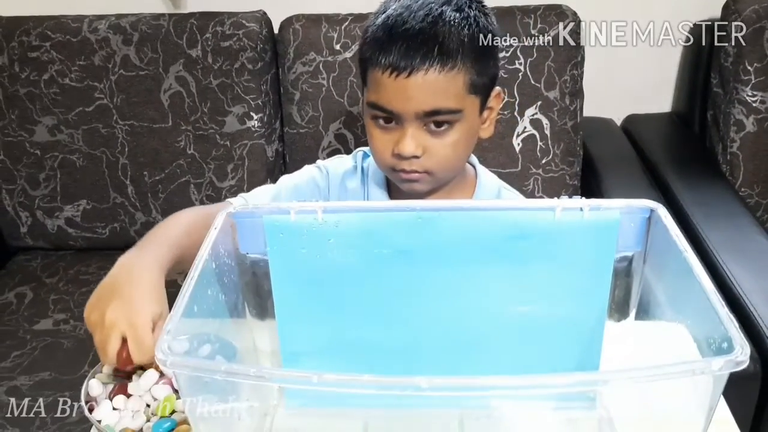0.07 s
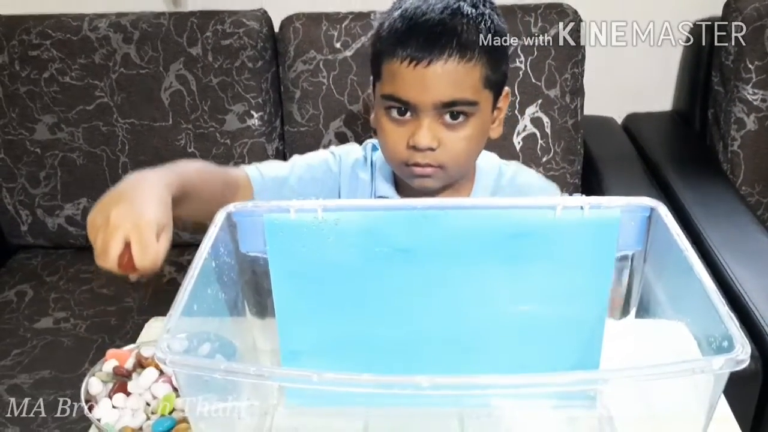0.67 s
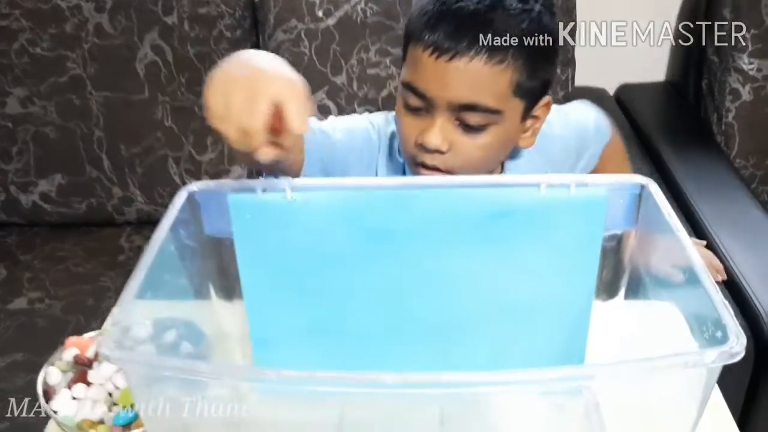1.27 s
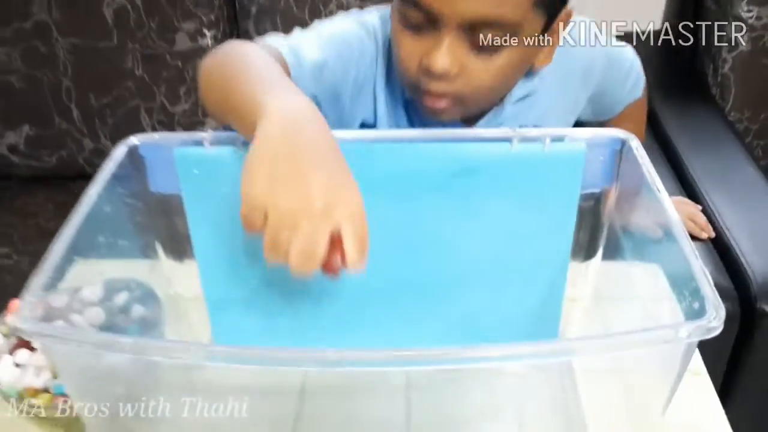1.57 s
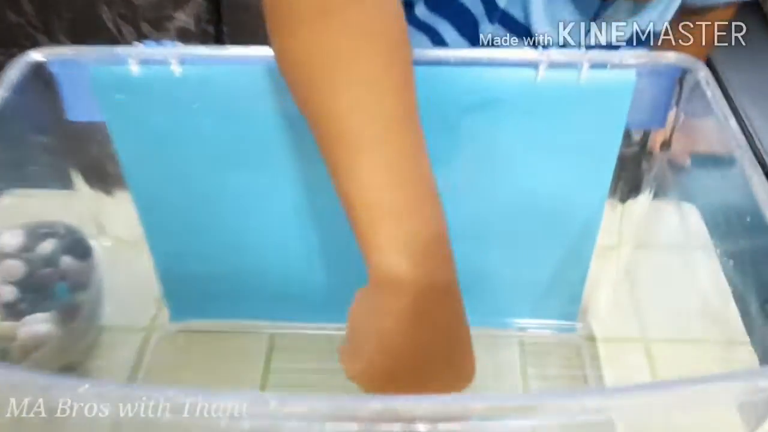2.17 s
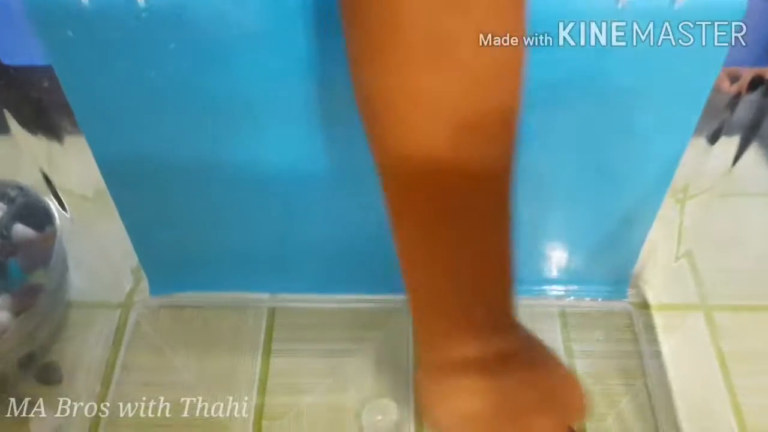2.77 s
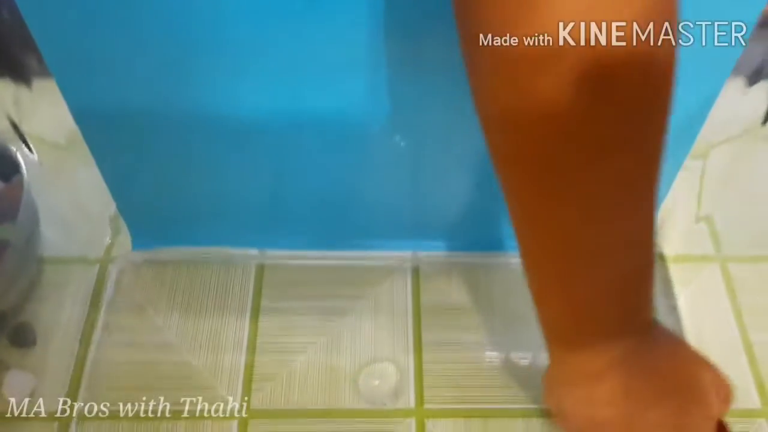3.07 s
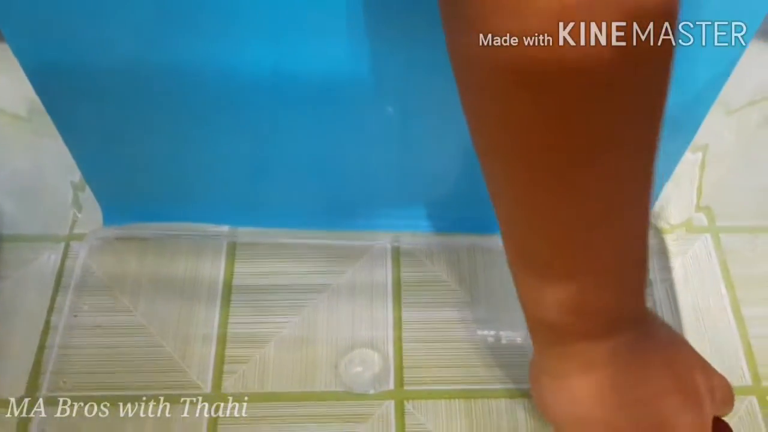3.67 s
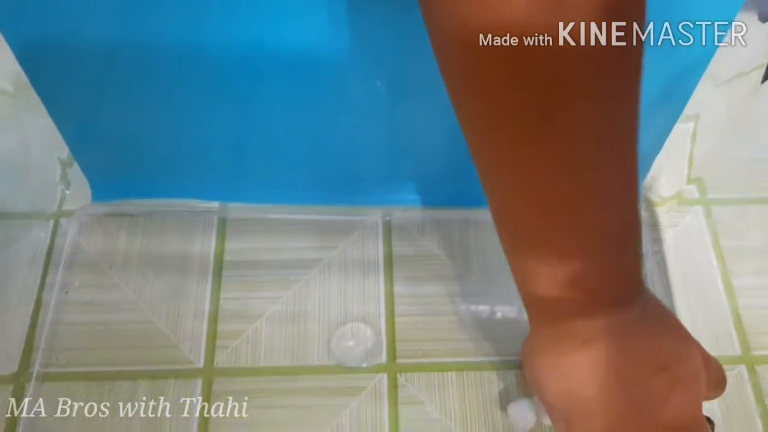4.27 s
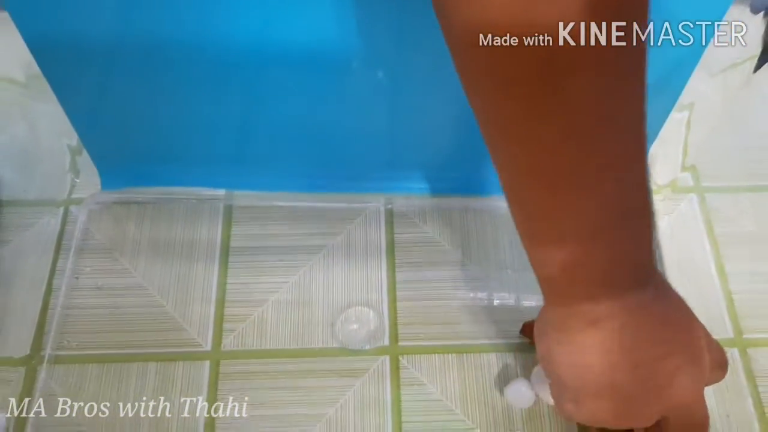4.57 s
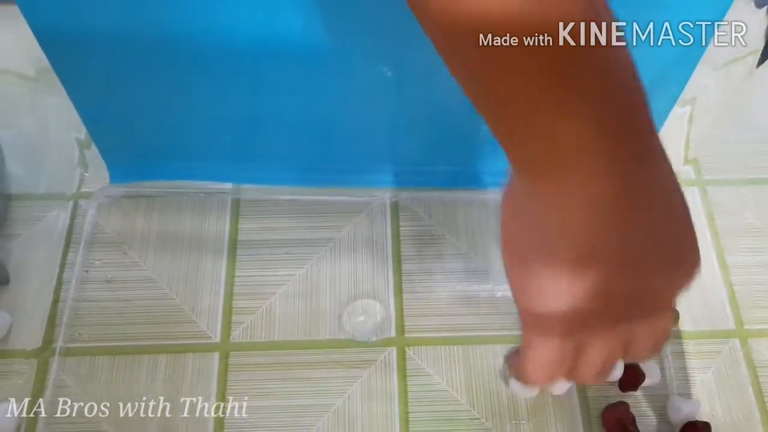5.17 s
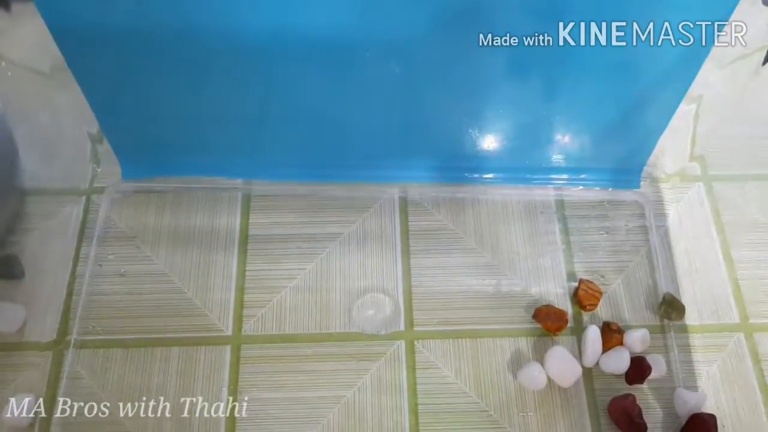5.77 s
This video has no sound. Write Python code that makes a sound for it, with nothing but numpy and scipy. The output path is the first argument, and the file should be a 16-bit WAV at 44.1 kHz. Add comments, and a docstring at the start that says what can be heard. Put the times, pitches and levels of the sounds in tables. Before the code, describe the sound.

Soft, dull bumps and rubbing come from a hand-held microphone, with a few light scuffs of skin against a plastic tub. Pebbles click in a fist, then fall into the empty tub, cracking, hopping and drumming on its thin bottom for about a second. A small tiled room rings briefly after them. A low thud and a faint rustle of cloth follow.

```python
"""A fistful of pebbles is dropped into an empty plastic tub in a small tiled room.
From 1 s a hand-held camera bumps and rubs softly while the arm reaches over the tub and brushes it.
The stones click in the fist, most as it opens near 4 s. Until 5 s they crack, hop and drum on the
thin floor, ringing the tub's modes, and the room rings after them. Last, the arm withdraws with
a low thud and a rustle of cloth, and the grip on the camera settles."""
import sys
import numpy as np
from scipy import signal
from scipy.fft import rfft, irfft
from scipy.io import wavfile
from scipy.ndimage import uniform_filter1d

SR = 44100
rng = np.random.default_rng(int(sys.argv[2]) if len(sys.argv) > 2 else 0)


def to_wav(s):
    """Save 16-bit WAV."""
    ch = np.atleast_2d(s).T  # columns
    pcm = np.round(np.clip(ch, -1, 1) * 32767)  # PCM
    wavfile.write(sys.argv[1], SR, pcm.astype(np.int16))


N = 265923


def gain_of(db):
    """Decibels to amplitude."""
    return 10 ** (np.asarray(db) / 20)


def pan(left_db):
    """Stereo gains for a left-over-right level difference."""
    return gain_of(np.vstack([left_db, -left_db]) / 2)


def read(points, hz):
    """Interpolates a (frequency, value) table on a log-frequency axis."""
    table_hz, value = np.transpose(points)
    return np.interp(np.log(hz + 1), np.log(table_hz + 1), value)


def unit(x):
    """Scales to energy 1 per channel."""
    return x / np.sqrt(np.sum(x ** 2) / len(x) + 1e-20)


def rise(t, rise_s):
    """Exponential approach to 1."""
    return 1 - np.exp(-t / rise_s)


def fade(t, t60_s):
    """Exponential decay, 60 dB in t60_s."""
    return np.exp(-np.log(1000) * t / t60_s)


def gate(t, length_s, attack_s, t60_s):
    """Linear attack at t = 0, hold until length_s, decay."""
    return np.clip(t / attack_s, 0, 1) * fade(np.maximum(t - length_s, 0), t60_s)


def add(mix, time_s, sound):
    """Mixes a sound in at time_s."""
    part = mix[:, round(time_s * SR):][:, :sound.shape[1]]
    part += sound[:, :part.shape[1]]


def colour(x, *spectra, size=4096):
    """Minimum-phase filter; its gain in dB is the sum of the spectra."""
    hz = abs(np.fft.fftfreq(size, 1 / SR))
    log_gain = np.log(gain_of(sum(read(points, hz) for points in spectra)))
    taps = np.fft.ifft(np.exp(np.conj(signal.hilbert(log_gain)))).real[:size // 2]
    return signal.fftconvolve(x, taps[None], axes=1)[:, :x.shape[1]]


# Left-right likeness of the sound field: (frequency [Hz], coherence [ratio])
COHERENCE = [(60, 0.88), (300, 0.89), (650, 0.45), (1300, 0), (16000, 0.088)]
def noise(size):
    """Stereo white noise, alike in the bass and unrelated in the treble."""
    left, other = rfft(rng.standard_normal((2, size)))
    alike = read(COHERENCE, np.fft.rfftfreq(size, 1 / SR))
    right = alike * left + np.sqrt(1 - alike ** 2) * other
    return irfft(np.array([left, right]), size)


def grainy(size, rough_db, grain_samples=60):
    """Friction noise: the level jumps from catch to catch."""
    catches = uniform_filter1d(rng.standard_normal(size), grain_samples) * np.sqrt(grain_samples)
    return noise(size) * gain_of(rough_db * catches)


def steady(spectrum, rough_db):
    """Scene-long coloured noise, rms 1."""
    return np.sqrt(N) * unit(colour(grainy(N, rough_db), spectrum))


def dense_modes(t60_table, size, bands=8):
    """Countless modes struck at once: noise of flat energy, each band with its own decay."""
    t, hz = np.arange(size) / SR, np.fft.rfftfreq(size, 1 / SR)
    spectrum, out = rfft(noise(size)), np.zeros((2, size))
    centres_hz = np.geomspace(150, 15000, bands)
    for centre_hz, weights in zip(centres_hz, np.eye(bands)):
        t60_s = read(t60_table, centre_hz)
        band = irfft(spectrum * read(np.c_[centres_hz, weights], hz), size)
        out += band * fade(t, t60_s) / np.sqrt(t60_s)
    return unit(out)


# Room tone: (frequency [Hz], gain [dB])
AIR_SPECTRUM = [(25, -17), (60, -8), (110, -8), (170, 3), (230, -15.5), (320, -12), (480, -14), (660, -8),
                (1000, -15.5), (2000, -16), (3200, -22.5), (8000, -24.5), (15000, -35)]
def air(rms_db=-63):
    """Faint, steady, low room noise."""
    return gain_of(rms_db) * steady(AIR_SPECTRUM, rough_db=0.5)


# Decay of the tiled room: (frequency [Hz], t60 [s])
ROOM_DECAY = [(150, 0.96), (400, 0.81), (1200, .36), (4000, 0.37), (8000, 0.34), (15000, 0.34)]
def room(x, build_s=0.0023, size=32768):
    """Reflections gather over a few milliseconds and die away."""
    t = np.arange(size) / SR
    tail = dense_modes(ROOM_DECAY, size) * (1 - np.exp(-(t / build_s) ** 2))
    return signal.fftconvolve(x, unit(tail), axes=1)[:, :N]


# Shirt crumples: (start [s], length [s], level [dB])
CRUMPLES = [(5.253, 0.096, -60.5), (5.418, .08, -61), (5.898, 0.1, -64.5)]
# Cloth noise: (frequency [Hz], gain [dB])
CLOTH_SPECTRUM = [(200, -20), (400, -3), (1150, 0), (1700, -7), (2600, -6), (3500, -18), (12000, -28)]
def shirt_rustles():
    """The shirt crumples in short, dull bursts as the arm withdraws."""
    t, level = np.arange(N) / SR, np.zeros(N)
    for start_s, length_s, level_db in CRUMPLES:
        level += gain_of(level_db) * gate(t - start_s, length_s, attack_s=0.004, t60_s=0.09)
    return level * steady(CLOTH_SPECTRUM, rough_db=3)


# Grip rub as the camera swings over the tub, then settles: (time [s], level [dB])
GRIP_SWING = [(0.5, -65), (1.0, -58), (1.45, -48.5), (1.98, -47), (2.17, -54.5), (2.39, -59.5),
              (3.01, -65.5), (3.14, -58.5), (3.9, -62)]
GRIP_SETTLE = [(5.199, -61.5), (5.39, -53.5), (5.484, -48.5), (5.666, -60.5), (5.82, -62), (6.03, -52)]
# Sleeve strokes: (start [s], length [s], level [dB])
SLEEVE_STROKES = [(0.974, 0.069, -62.5), (1.559, 0.088, -58.5), (1.707, 0.14, -54.5), (3.039, 0.13, -58),
                  (3.217, 0.33, -58.5), (3.4, 0.059, -70)]
# Dull camera body and sliding hiss: (frequency [Hz], gain [dB])
CAMERA_SPECTRUM = [(30, -25), (60, -21), (105, -6.5), (220, -9), (310, -1.5), (380, -8.5), (500, -14.5),
                   (950, -18), (2900, -37.5), (8000, -58)]
HISS_SPECTRUM = [(500, -15), (2000, 4.5), (5000, 7), (9000, 2.5), (15000, 1)]
def rubbing(grip_hiss_db=-18):
    """Friction: the grip shifts on the camera and the sleeve slides along the arm."""
    t = np.arange(N) / SR
    times_s, grip_db = np.vstack([GRIP_SWING, GRIP_SETTLE]).T
    grip = gain_of(np.interp(t, times_s, grip_db))
    slide = gain_of(grip_hiss_db) * grip
    for start_s, length_s, level_db in SLEEVE_STROKES:
        stroke = gate(t - start_s, length_s, attack_s=0.024, t60_s=0.4)
        slide = np.hypot(slide, gain_of(level_db) * stroke)
    return grip * steady(CAMERA_SPECTRUM, rough_db=1.5) + slide * steady(HISS_SPECTRUM, rough_db=1.5)


# Hand on the camera: (time [s], energy [dB], hollow ring [Hz], ring level [dB])
CAMERA_KNOCKS = [(1.149, -15, 363, -2), (1.29, -12.5, 352, -0.5), (1.323, -14, 324, 1),
                 (1.478, -4.5, 308.5, -2), (1.535, -12, 329, -3), (1.741, -8.5, 317, 0),
                 (1.815, -7.5, 309.3, -3.5), (1.856, -9, 301.7, 6), (1.971, -12.5, 313, -6),
                 (2.045, -13.5, 301, -7), (2.107, -12.5, 288.7, -4), (2.579, -19.5, 245, 4),
                 (2.68, -21, 238, -1), (3.049, -11, 309, 5.5), (3.258, -17, 310.3, -1.5),
                 (5.25, -14, 349.5, 4.5), (5.426, -13.5, 315.4, 2), (5.595, -15, 284, -10)]
def camera_bumps(size=16384):
    """Padded knocks swell and die in the camera's hollow body; harder ones scrape more."""
    t, out = np.arange(size) / SR, np.zeros((2, N))
    swell = rise(t, 0.0082) * fade(t, 0.31)
    for time_s, energy_db, hollow_hz, hollow_db in CAMERA_KNOCKS:
        hollow = unit(swell * np.sin(2 * np.pi * hollow_hz * t)[None])
        push = unit(colour(grainy(size, rough_db=2) * swell, CAMERA_SPECTRUM))
        scrape_db = 15 + 1.18 * energy_db
        tilt = [(130, 0.5), (270, 0), (380, 0), (900, scrape_db)]
        bump = unit(colour(push + gain_of(hollow_db) * hollow, tilt))
        add(out, time_s, gain_of(energy_db) * bump)
    return out


# Arm reaching over the tub and lifting away: (time [s], peak [dB], frequency [Hz], t60 [s])
ARM_BLOWS = [(1.186, -48, 100, 0.19), (1.321, -51, 103.5, 0.23), (5.413, -32, 103.6, 0.37)]
def arm_thuds():
    """A soft, heavy push rings one low mode."""
    t, out = np.arange(SR // 2) / SR, np.zeros((2, N))
    for time_s, peak_db, hz, t60_s in ARM_BLOWS:
        swell = rise(t, 0.016) ** 2 * fade(t, t60_s)
        tone = np.sin(2 * np.pi * hz * t)[None]
        add(out, time_s, gain_of(peak_db) * swell / swell.max() * tone)
    return out


# Tub modes, plus one low hum of the room (first row): (frequency [Hz], relative energy [dB], t60 [s])
TUB_AND_ROOM_MODES = [(150.7, -37, 0.5), (250, -31, 0.2), (295, -24, .22), (325, -23, 0.2),
                      (352, -22, 0.24), (382, -23, 0.24), (428, -21, 0.37), (506, -29, .25),
                      (554, -29, .25), (646, -28.5, 0.38), (786, -32, 0.28), (960, -18.5, 0.22),
                      (1003, -17.5, 0.22), (1040, -24, .27), (1076, -23, 0.2), (1110, -23, 0.2),
                      (1180, -20, 0.2), (1416, -19, 0.22), (1535, -19, 0.22), (1599, -24, .27),
                      (1884, -19, 0.16), (1944, -19, 0.18), (1998, -22, .16), (2133, -19.5, 0.18),
                      (2202, -24, .16), (2305, -23, 0.16), (2439, -24, .16), (2656, -19, 0.16),
                      (2816, -20, 0.15), (2950, -22, .15), (3004, -21, 0.15), (3444, -22, 0.14),
                      (3709, -24, .14), (3914, -24, .14)]
def mode_rings(size, build_cycles=0.35, detune=0.0031):
    """One slightly detuned stereo ring per mode; high modes reach the two sides out of step."""
    t, rings = np.arange(size) / SR, []
    for hz, energy_db, t60_s in TUB_AND_ROOM_MODES:
        lag_rad = np.arccos(read(COHERENCE, hz)) * rng.choice([-1, 1])
        hz *= 1 + detune * rng.uniform(-0.73, 1)
        swell = rise(t, build_cycles / hz) * fade(t, t60_s)
        tone = np.sin(2 * np.pi * hz * t + np.array([[0], [lag_rad]]))
        rings.append(gain_of(energy_db) * unit(swell * tone))
    return np.array(rings)


def resonance(hz, db, width):
    """Spectrum of one peak; width is a share of its frequency."""
    return [(hz / (1 + width), 0), (hz, db), (hz * (1 + width), 0)]


# Skin on plastic: (time [s], energy [dB], length [s], rise [s], treble [dB],
# wall resonance [Hz], its height [dB], rasp [Hz], its height [dB])
SKIN_STROKES = [(1.167, -18.5, 0.045, .004, -12, 1480, 12, 3000, 4),
                (1.299, -16.5, 0.057, .003, -17, 1600, 0, 3800, 0),
                (1.601, -20, 0.11, 0.0063, -23, 2200, -3, 3400, -4),
                (2.487, -14.5, 0.052, .0015, 4, 1780, 10.5, 6400, 9.5),
                (2.553, -18.5, 0.054, 0.0018, -2.5, 1740, 11, 2860, -1),
                (5.498, -21, 0.081, 0.014, -3.5, 1890, 2, 4100, -2.5)]
# Skin friction: (frequency [Hz], gain [dB])
SKIN_SPECTRUM = [(400, -23), (650, -1), (900, -5.5), (1450, -3), (1800, -5.5), (2250, 0), (2800, -4.5),
                 (5000, 0), (6400, -1), (7600, -1.5), (9600, -3.5), (15000, -6.5)]
def skin_scuffs(release_s=0.034, catch_db=3, ring_db=-14.5, size=16384):
    """Skin catches, jerks over a resonant patch of wall and lets go; the modes ring faintly."""
    t, out = np.arange(size) / SR, np.zeros((2, N))
    modes = mode_rings(size).sum(0)
    catch = gain_of(catch_db) * fade(t, 0.038)
    for time_s, energy_db, length_s, rise_s, treble_db, *peaks in SKIN_STROKES:
        wall_hz, wall_db, rasp_hz, rasp_db = peaks
        stroke = np.exp(-t / length_s / 2 - np.maximum(t - length_s, 0) / release_s)
        jerks = grainy(size, rough_db=0.5, grain_samples=70) * (stroke + catch) * rise(t, rise_s)
        patch = resonance(wall_hz, wall_db, width=0.16), resonance(rasp_hz, rasp_db, width=0.26)
        slide = colour(jerks, SKIN_SPECTRUM, *patch, [(3000, 0), (12000, treble_db)])
        ring = signal.fftconvolve(slide, modes, axes=1)[:, :size]
        add(out, time_s, gain_of(energy_db) * unit(unit(slide) + gain_of(ring_db) * unit(ring)))
    return out


# Stone on stone in the fist: (time [s], energy [dB])
FIST_CONTACTS = [(2.374, -32), (3.634, -26), (3.658, -23), (3.695, -31.5), (3.884, -32), (3.932, -13),
                 (3.961, -9.5), (3.9844, -11), (3.996, -18), (4.009, -17), (4.0156, -0.5), (4.018, -6),
                 (4.032, -4)]
# Jostling in the opening fist, then the falling heap: (start [s], end [s], rate [1/s], top energy [dB])
JOSTLE_SPANS = [(3.957, 4.042, 170, -19.5), (4.089, 4.28, 80, -2.5)]
def stone_contacts(nudge_s=0.0023, nudge_db=-18.5, range_db=10.5):
    """Each contact in the fist nudges a neighbour; jostling adds more at random."""
    for time_s, energy_db in FIST_CONTACTS:
        yield time_s, energy_db
        yield time_s + nudge_s * rng.uniform(0.5, 1.5), energy_db + nudge_db
    for start_s, end_s, rate_hz, top_db in JOSTLE_SPANS:
        for time_s in np.arange(start_s, end_s, 1 / rate_hz):
            yield time_s + rng.random() / rate_hz, top_db - range_db * rng.random()


# Stone-on-stone tick: (frequency [Hz], gain [dB])
CLINK_SPECTRUM = [(300, -34.5), (1500, -14), (3300, -4), (6000, 1), (10000, 2.5), (13500, 0.5),
                  (16000, -5.5)]
def stone_clinks(ring_db=-8, t60_s=0.017, modes=7, size=4096):
    """Stones slip against each other: dry ticks with short, high rings, brighter when harder."""
    t, out = np.arange(size) / SR, np.zeros((2, N))
    for time_s, energy_db in stone_contacts():
        hz, phase = rng.uniform(4000, 11000, (modes, 1, 1)), rng.random((modes, 2, 1))
        ring = unit(np.sin(2 * np.pi * (hz * t + phase)).sum(0))
        tick = (unit(noise(size)) + gain_of(ring_db) * ring) * fade(t, t60_s)
        treble_db = 8.5 + 0.32 * energy_db
        tick = unit(colour(tick, CLINK_SPECTRUM, [(5000, 0), (11000, treble_db)]))
        add(out, time_s, gain_of(energy_db) * pan(left_db=2) * tick)
    return out


def floor_flex(size):
    """The whole floor drums, at a slightly different pitch for each load."""
    t = np.arange(size) / SR
    hz = 278 + 3.5 * rng.uniform(-0.12, 1)
    return unit(rise(t, 0.017) * fade(t, 0.4) * np.sin(2 * np.pi * hz * t)[None])


def tub_jolt(level_db, size, hz=72, t60_s=0.036):
    """A landing shoves the whole tub: a deep, damped swing, stronger for heavy hits."""
    t = np.arange(size) / SR
    swing = unit(t * fade(t, t60_s) * np.sin(2 * np.pi * hz * t)[None])
    return gain_of(-47 + 0.82 * level_db) * swing


CONTACT_RISE_S = 0.0005  # the plastic gives way first
# First instant of contact: (frequency [Hz], gain [dB])
SNAP_SPECTRUM = [(300, -27.5), (1000, -4.5), (2400, 0), (6000, 0), (12000, -10), (15500, -10.5)]
def contact_snap(contact, snap_db=-8, t60_s=0.0095, size=1024):
    """Stone meets plastic with a dry, bright snap."""
    t = np.arange(size) / SR
    burst = noise(size) * rise(t, CONTACT_RISE_S) * fade(t, t60_s)
    snap = unit(colour(burst, SNAP_SPECTRUM, size=size))
    return gain_of(snap_db) * colour(snap, contact, size=size)


# Dense, short-lived tub modes: (frequency [Hz], gain [dB])
CLACK_SPECTRUM = [(60, -34), (205, -31.5), (290, -2.5), (425, -4), (480, -12.5), (600, -7.5), (800, -7.5),
                  (1000, -2.5), (1300, -5.5), (1550, -6.5), (1720, -7.5), (1950, -2), (3500, -6),
                  (7500, -9), (9700, -17), (12000, -16), (15500, -24)]
# Their decay: (frequency [Hz], t60 [s])
CLACK_DECAY = [(300, 0.14), (1500, 0.072), (5000, 0.046), (12000, 0.026)]
def tub_clack(contact, common_modes, common_share=0.066, crack_db=-5, clack_db=-3):
    """Dense modes, partly common to all hits, plus the spiky chatter of the stone's corners."""
    size = common_modes.shape[1]
    t = np.arange(size) / SR
    own_modes = dense_modes(CLACK_DECAY, size)
    clack = np.sqrt(common_share) * common_modes + np.sqrt(1 - common_share) * own_modes
    crack = noise(size) ** 3 * rise(t, CONTACT_RISE_S) * fade(t, 0.013)
    clack += gain_of(crack_db) * unit(colour(crack, [(800, -10), (9000, 1)]))
    add(clack, rng.uniform(0.0015, 0.004), 0.53 * clack)  # echo off the far wall
    return gain_of(clack_db) * colour(unit(colour(clack, CLACK_SPECTRUM)), contact)


def tub_interference(clack, ripple_db=9):
    """Paths inside the tub interfere: random spectral ripple at unchanged energy."""
    hz = np.arange(500, 17000, 180)
    ripple = rng.uniform(-ripple_db, ripple_db, len(hz)) * (hz > hz[0])
    rippled = colour(clack, np.c_[hz, ripple])
    return rippled * np.linalg.norm(clack) / np.linalg.norm(rippled)


def struck_modes(contact, tunings, spot_db=3, modes_db=-2.5):
    """The spot that is hit favours some modes over others."""
    hz = np.transpose(TUB_AND_ROOM_MODES)[0]
    signs = rng.choice([-1, 1], len(hz))
    drive_db = spot_db * rng.uniform(-0.11, 1, len(hz)) + read(contact, hz)
    rings = tunings[rng.integers(len(tunings))]
    return np.einsum("m,mct->ct", signs * gain_of(modes_db + drive_db), rings)


def contact_spectrum(level_db, treble_db, knock_db, wall_db, body_db):
    """Heavy stones push more bass; hard, brief contacts give more treble."""
    bass_db = -4.5 + 0.51 * level_db
    low_mid_db = bass_db + body_db
    return [(170, 0.99), (280, bass_db), (380, low_mid_db), (650, (low_mid_db + knock_db) / 2),
            (1000, knock_db), (1500, wall_db), (1900, 0.29), (2600, 0.33), (10000, treble_db)]


# Stereo balance of the tub: (frequency [Hz], left over right [dB])
TUB_BALANCE = [(300, 5), (550, 6), (1100, 0), (2100, 9), (4200, 2.5), (6400, -1), (10000, 4)]
def lean_left(x):
    """The stones land nearer the left microphone; the balance varies by band."""
    left_db = read(TUB_BALANCE, np.fft.rfftfreq(N, 1 / SR))
    return irfft(rfft(x) * pan(left_db), N)


# Pebbles on the tub floor, the handful then stragglers: (time [s], level [dB], treble [dB],
# 1 kHz knock [dB], 1.5 kHz walls [dB], 380 Hz body [dB], floor flex [dB], hop [s], rebound [dB])
PEBBLE_DROPS = [(4.0473, 11.5, 0, 1.5, -6, 2, -23.5, 0.0017, -1.5),
                (4.0624, -2.5, 5.5, -4, -2, 0, -23, 0.0047, -5.5),
                (4.0691, 13.5, -1.5, -1.5, 1.5, -5.5, -25.5, 0.0031, -2.5),
                (4.0972, 6.5, 8.5, -5, 3.5, -2, -23, 0.0098, 0),
                (4.1018, 10, -2.5, -2, 3, 1.5, -17.5, .0046, -2.5),
                (4.1202, 6, 3, 3.5, 1, -2.5, -26.5, 0.0052, 0.5),
                (4.1294, 5.5, 5.5, -7.5, -4.5, -2.5, -25.5, 0.0083, -2.5),
                (4.1455, 13.5, -4.5, 6.5, 2.5, -2, -19.5, .0035, -1),
                (4.1722, 10, 6.5, -0.5, 4, -4.5, -18.5, .002, -1),
                (4.1936, 11.5, 3.5, 1.5, 1, 0, -15.5, .0035, -1.5),
                (4.2206, 6.5, -1.5, 3.5, 4, -2, -26.5, .003, -1.5),
                (4.2433, 3.5, 7.5, -4, 4, 3, -18, .004, -4),
                (4.2535, 10, -8.5, 2.5, 4, 5.5, -29.5, 0.0016, -2),
                (4.267, 4, -2.5, -15, -1, 1.5, -32, .0023, -5.5),
                (4.2822, -3.5, -3.5, 4, 2, 0.5, -28, 0.0033, -3),
                (4.304, 13.5, -3, 1, 0, -0.5, -30.5, 0.009, -4),
                (4.337, -7, -24.5, -4, 0, 7, -7.5, 0.0065, 2),
                (4.365, -5.5, 5, 4.5, 5.5, 3.5, -31, 0.0033, -7.5),
                (4.4685, -12.5, -28.5, 9, 11, 2.5, -10.5, 0.015, -4.5),
                (4.5028, 5, -7, 3, -0.5, -6, -13.5, 0.0021, 2.5),
                (4.5158, 9.5, -7, -3, -5, -4, -15.5, 0.0022, -1.5),
                (4.532, -6, -6, -5, 2, 1, -13.5, 0.0037, -0.5),
                (4.559, 8.5, -1, 0, -0.5, -4.5, -34, .0037, -6.5),
                (4.5966, 4.5, 2.5, -4.5, -4.5, 3, -29, .0025, -4.5),
                (4.744, -9, -32, -20.5, -10, -1, -29, 0.013, -5),
                (4.7528, -2.5, -1.5, -2, -5, 3.5, -32, 0.0034, -4.5),
                (4.7655, -5.5, 3.5, 0, -1, 4, -36, 0.0025, -14),
                (4.7802, -5.5, -3, -23, -9, -2, -26, 0.0077, -4),
                (4.7972, 1.5, 1.5, -4.5, -1.5, -2.5, -24, 0.0029, -5.5),
                (4.8128, -3.5, -5, 0.5, -5, -2, -41, .0034, -8),
                (4.9398, 3.5, 4, 2.5, 0, -0.5, -13.5, .0038, 0)]
def landings():
    """A stone lands on a corner, hops once and lands again, a little duller."""
    for time_s, level_db, treble_db, *mids_db, flex_db, hop_s, rebound_db in PEBBLE_DROPS:
        yield time_s, level_db, treble_db, mids_db, flex_db
        yield time_s + hop_s, level_db + rebound_db, treble_db - 1.5, mids_db, flex_db + 1


def pebbles(pan_scatter_db=0.9, ring_send_db=-9, clack_size=6144, ring_size=16384):
    """Each landing snaps, clacks, rings and jolts the tub; returns direct sound and room send."""
    direct, send = np.zeros((2, N)), np.zeros((2, N))
    tunings = [mode_rings(ring_size) for _ in range(4)]
    common_modes = dense_modes(CLACK_DECAY, clack_size)
    for time_s, level_db, treble_db, mids_db, flex_db in landings():
        contact = contact_spectrum(level_db, treble_db, *mids_db)
        ring = struck_modes(contact, tunings) + gain_of(flex_db) * floor_flex(ring_size)
        clack = tub_clack(contact, common_modes)
        rippled = tub_interference(clack)
        position = pan(pan_scatter_db * rng.standard_normal())
        for part in rippled, ring, contact_snap(contact), tub_jolt(level_db, clack_size):
            add(direct, time_s, gain_of(level_db) * position * part)
        for part in clack, gain_of(ring_send_db) * ring:
            add(send, time_s, gain_of(level_db) * part)
    return lean_left(direct), send


def scene(tub_room_db=-7, clink_room_db=-11, scuff_room_db=-5):
    """Stones and scuffs excite the room; the rest stays dry."""
    tub, tub_send = pebbles()
    clinks, scuffs = stone_clinks(), skin_scuffs()
    echo = room(gain_of(tub_room_db) * tub_send + gain_of(clink_room_db) * clinks
                + gain_of(scuff_room_db) * scuffs)
    background = camera_bumps() + arm_thuds() + rubbing() + shirt_rustles() + air()
    return background + echo + scuffs + clinks + tub


def record(dry):
    """Soft peak limiting, then a low-pass."""
    ceiling, cutoff_hz = 0.9, 15750
    rounded = dry / (1 + (dry / ceiling) ** 4) ** 0.25
    taps = signal.firwin(255, cutoff_hz, window=("kaiser", 9), fs=SR)
    return signal.oaconvolve(rounded, taps[None], "same", axes=1)


dry = scene()
out = record(dry)
to_wav(out)
```